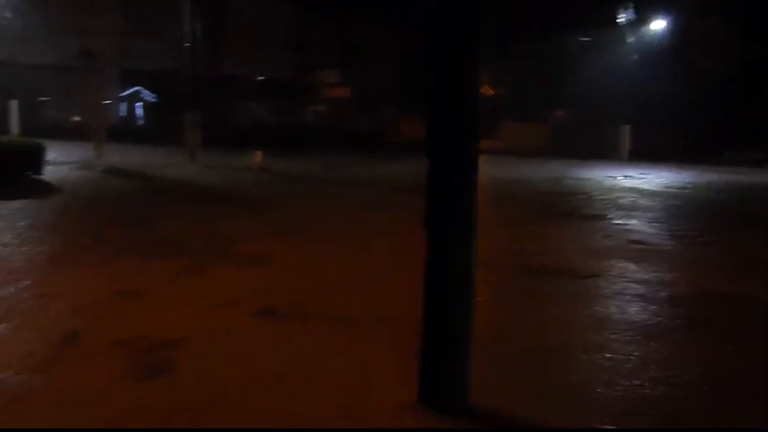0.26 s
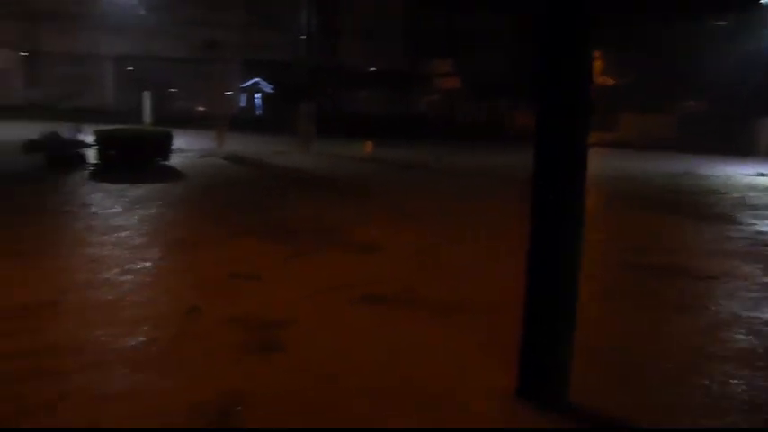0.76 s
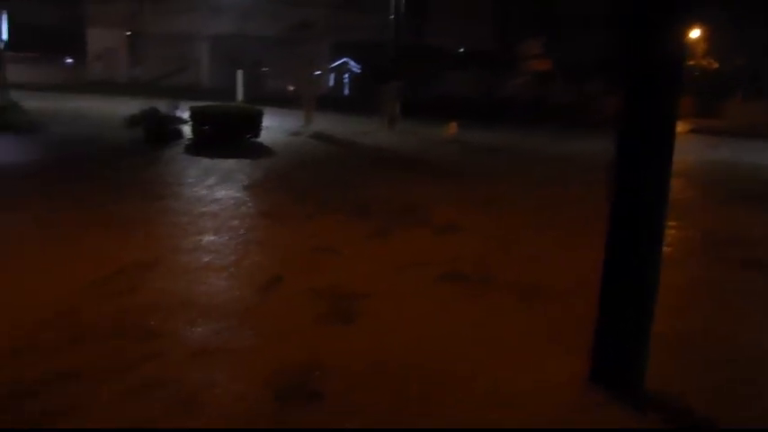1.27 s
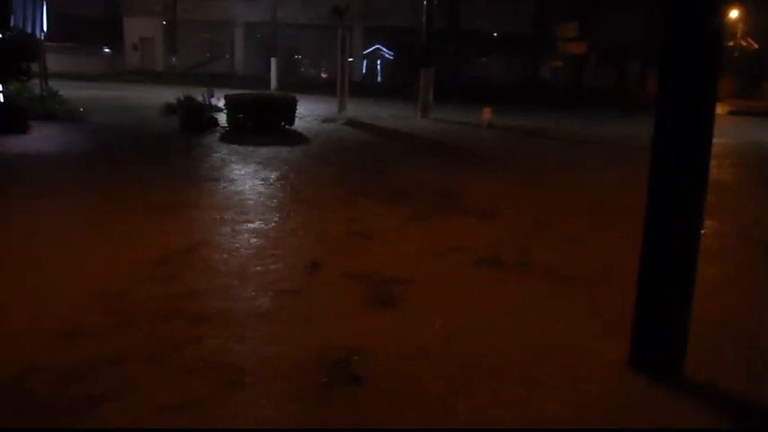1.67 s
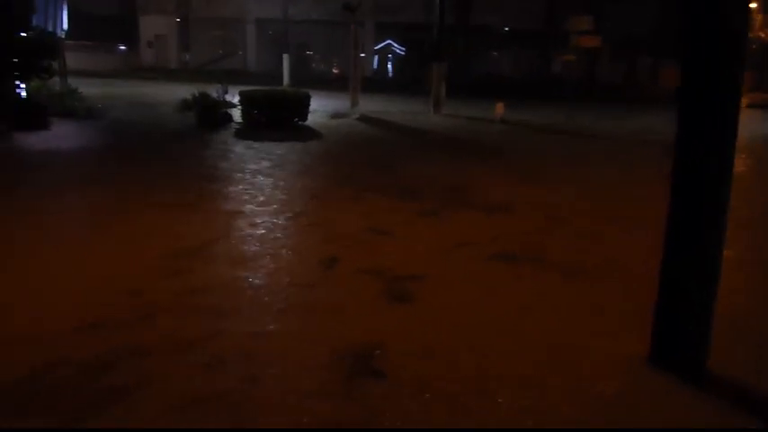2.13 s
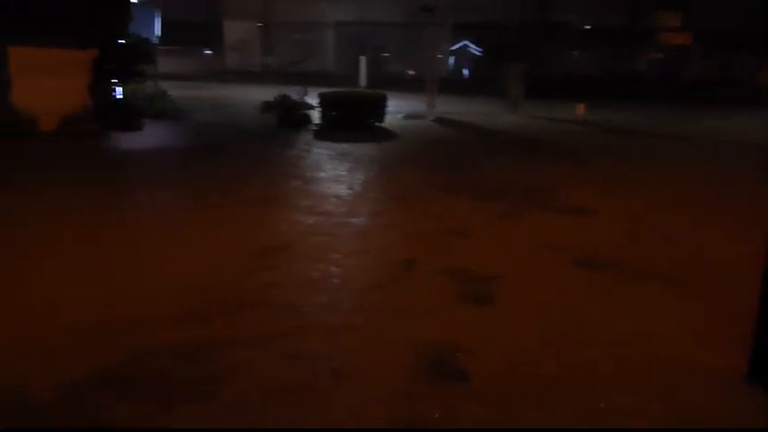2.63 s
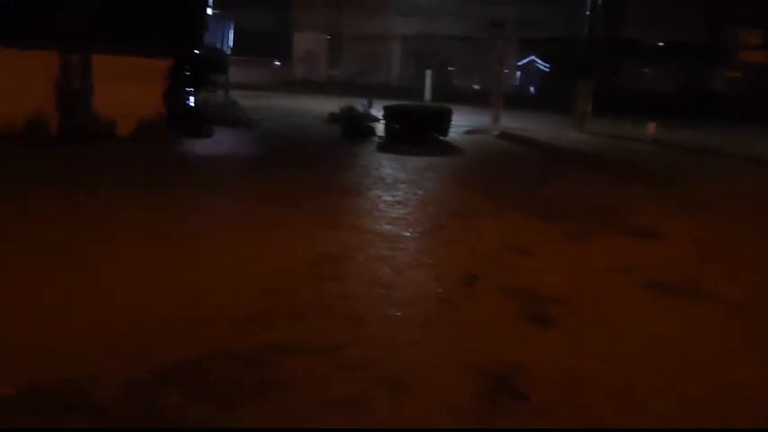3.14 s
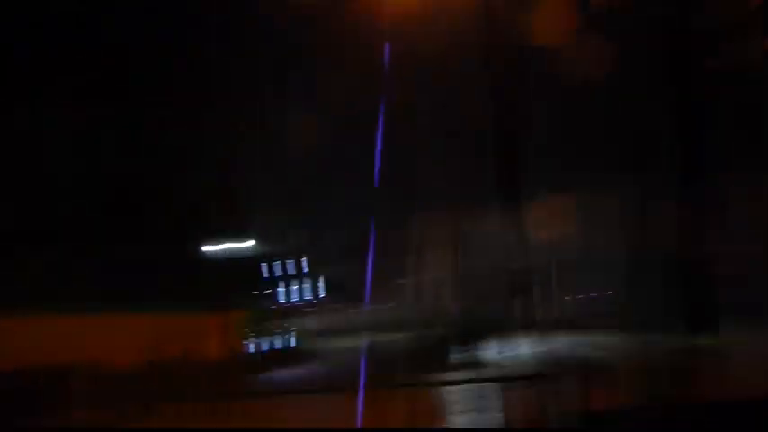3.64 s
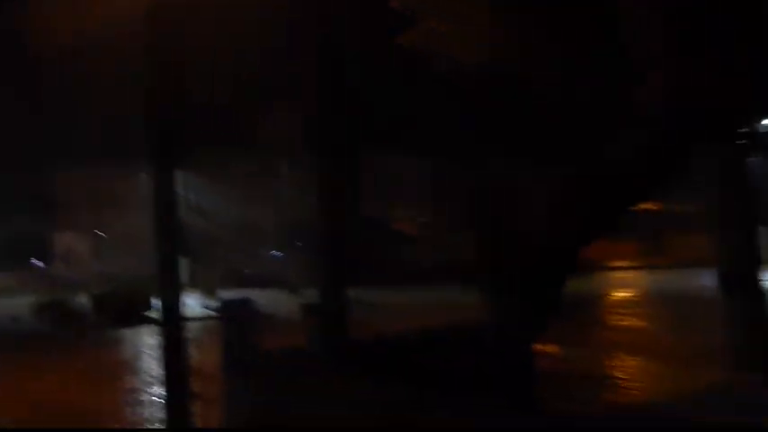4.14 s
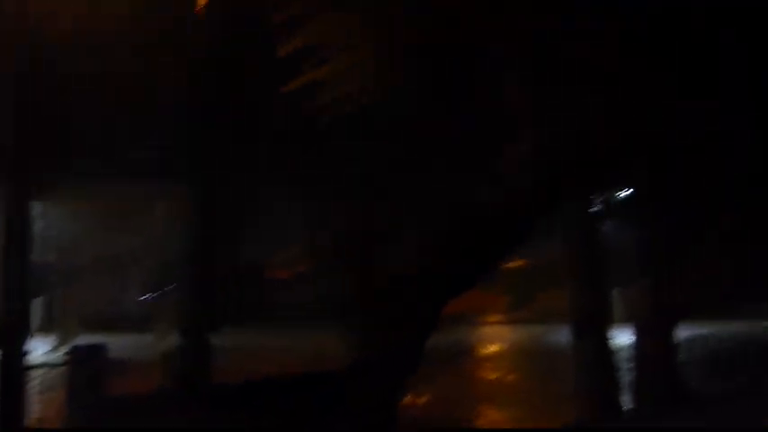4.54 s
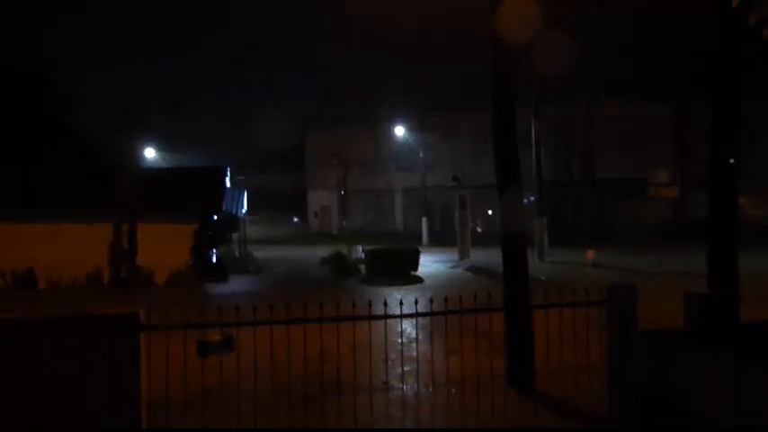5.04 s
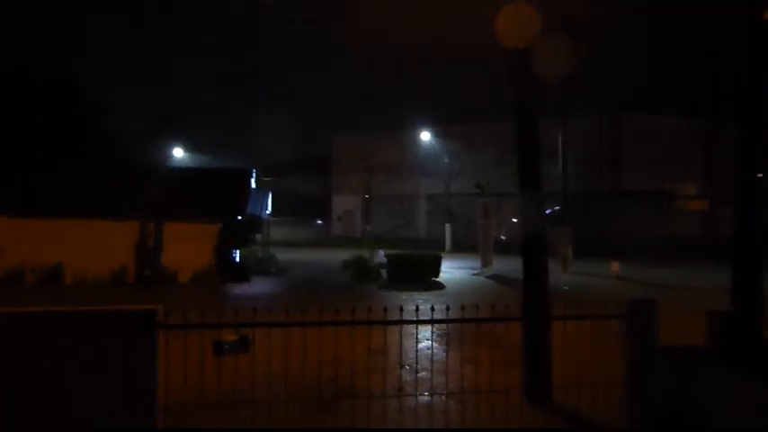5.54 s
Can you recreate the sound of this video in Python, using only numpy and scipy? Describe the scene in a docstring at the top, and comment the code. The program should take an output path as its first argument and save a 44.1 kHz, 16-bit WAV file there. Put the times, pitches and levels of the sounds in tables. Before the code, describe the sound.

Roof runoff slaps onto wet ground over a heavy downpour; the sound cuts out twice, returning as rain alone.

```python
"""Torrential night rain on a flooded street, heard from under a roof.
Runoff from the eaves slaps onto wet ground close by, in quick splats over the hiss of the downpour.
The sound cuts out twice. From the first gap on the runoff is gone, leaving the street: an even wash,
low drumming and fine spray. A few close ticks, puddle plinks and dull roof thuds dot the rain."""
import sys
import numpy as np
from scipy import signal
from scipy.fft import rfft, irfft, next_fast_len
from scipy.io import wavfile
from scipy.ndimage import uniform_filter1d, map_coordinates

SR = 44100
rng = np.random.default_rng(int(sys.argv[2]) if len(sys.argv) > 2 else 0)


def digitize_waveform(pressure):
    """Quantize a signal to 16-bit integers and store it at the path in sys.argv[1].

    Rows of a 2-D input are taken as channels; values are limited to [-1, 1].
    """
    field = np.atleast_2d(pressure).T
    bounded = np.clip(field, -1, 1)
    quanta = np.round(bounded * 32767).astype(np.int16)
    wavfile.write(sys.argv[1], SR, quanta)


N = 255780
TIME = np.arange(N) / SR

# the heaviest blobs of water landing: t/s, level/dB, nominal pitch/Hz, brightness/dB
BLOB_HITS = [(.010, -17, 1060, 4), (.026, -17.5, 930, 3), (.029, -16, 730, -3), (.035, -17.5, 790, 0),
             (.064, -13.5, 770, -2), (.067, -13.5, 800, 1), (.110, -10, 800, -6), (.202, -15, 900, -2),
             (.256, -17, 850, -1), (.343, -16.5, 830, 1), (.398, -15.5, 730, -1), (.439, -18.5, 1050, 1),
             (.446, -17, 1170, 1), (.511, -15.5, 880, 6), (.514, -18, 880, -1), (.540, -17, 700, 2),
             (.558, -19.5, 1030, 2), (.581, -16.5, 950, 1), (.584, -18, 780, 4), (.614, -15.5, 1010, -4),
             (.627, -18, 760, 2), (.636, -17, 1160, 1), (.642, -18.5, 890, 4), (.650, -18, 1020, 2),
             (.658, -18.5, 1120, 2), (.698, -15.5, 720, -1), (.752, -17.5, 900, 5), (.756, -18, 960, 3),
             (.779, -17, 1050, 1), (.835, -19, 1110, 0), (.850, -19, 940, -5), (.879, -19, 840, 0),
             (.920, -15.5, 890, -1), (.930, -18, 1040, 1), (.946, -12.3, 1080, -3), (1.008, -17, 740, 2),
             (1.039, -18, 880, 5), (1.068, -16, 1050, 1), (1.075, -17, 740, 2), (1.086, -15.5, 1080, 2),
             (1.107, -18, 900, 0), (1.134, -19, 1030, 3), (1.156, -17, 1000, 4), (1.180, -15, 780, -3),
             (1.202, -18, 820, 3), (1.232, -19, 760, 3), (1.269, -15.5, 780, -2), (1.288, -17, 1030, 0),
             (1.363, -16, 900, 3), (1.369, -17, 930, 6), (1.401, -16, 830, -1), (1.441, -17, 1000, 2),
             (1.464, -15.5, 1000, -1), (1.530, -15, 930, 0), (1.539, -18, 960, -6), (1.570, -18, 1040, -4),
             (1.578, -14.5, 850, 1), (1.625, -13, 1150, 0), (1.639, -18, 1110, 5), (1.643, -15.5, 800, -1),
             (1.671, -16, 800, -1), (1.677, -17.5, 1040, 1), (1.680, -15.5, 830, 0), (1.693, -18, 1090, 2),
             (1.699, -15, 740, 1), (1.709, -16, 1000, 3), (1.717, -15, 820, 1), (1.751, -19, 1000, -3),
             (1.773, -15, 840, 1), (1.779, -18, 840, 1), (1.799, -17, 1090, -2), (1.834, -18, 1160, -1),
             (1.865, -15, 980, -1), (1.900, -17.5, 950, -1), (1.934, -18, 1080, 0), (1.958, -17, 1130, 0),
             (1.983, -12, 830, -5), (2.088, -16.5, 1130, -1), (2.122, -18, 890, 0), (2.152, -17, 1060, -2),
             (2.196, -17, 780, -1), (2.203, -14.5, 830, -3), (2.226, -18, 830, 2), (2.254, -16.5, 1110, -1),
             (2.259, -17, 940, -2), (2.286, -18, 1090, 0), (2.312, -18, 1100, 2), (2.339, -17.5, 1140, 0),
             (2.347, -16.5, 980, 2), (2.392, -17, 920, 1), (2.395, -17.5, 1200, 0), (2.414, -15.5, 780, 2),
             (2.426, -15.5, 850, 3), (2.456, -13.5, 840, -8), (2.502, -18, 1000, 1), (2.526, -17, 1000, 0),
             (2.560, -15.5, 960, 0), (2.572, -18, 1090, 6), (2.622, -17, 950, -3), (2.681, -14.5, 1020, 0),
             (2.761, -16.5, 840, 0), (2.796, -15.5, 1070, -2), (2.827, -16.5, 1000, 5),
             (2.834, -17, 840, -6), (2.847, -16.5, 880, -3), (2.856, -14.5, 910, -2), (2.862, -14, 900, 1),
             (2.938, -17.5, 1200, 0), (2.986, -17, 1000, 2), (3.027, -15, 850, 5), (3.068, -18, 950, -2),
             (3.073, -15, 760, -2), (3.109, -16, 940, -1), (3.177, -17, 1030, -4), (3.234, -17, 870, -4)]
# tone of water slapping wet ground: f/Hz, level/dB
SLAP_EQ = [(30, -41), (100, -29), (280, -4.5), (480, -2.5), (650, 2), (1000, 0), (1480, -6), (1800, -11.5),
           (2600, -11.5), (5000, -14), (9500, -17.5), (12500, -22.5), (16000, -73)]
# stereo image of the slaps: f/Hz, left-right likeness (-1 to 1)
SLAP_IMAGE = [(40, 0.56), (200, 0.95), (1100, 0.93), (2200, 0.76), (5500, 0.77), (7000, 0.99), (11000, 1),
              (13000, 0.5)]


def amp(db):
    """Decibels to gain."""
    return 10 ** (np.asarray(db) / 20)


def unit(x):
    """Scale to rms 1."""
    return x / np.sqrt(np.mean(x ** 2) + 1e-20)


def along(points, hz):
    """Read (f/Hz, value) points on a log axis."""
    f, values = np.transpose(points)
    return np.interp(np.log(hz + 1), np.log(f + 1), values)


def curves(rows):
    """One envelope for each column after the time."""
    s, *columns = np.transpose(rows)
    return [np.interp(TIME, s, column) for column in columns]


def wobble(rate):
    """A smooth random curve with rate knots a second."""
    return map_coordinates(rng.standard_normal(int(N * rate / SR) + 4), [TIME * rate])


def filtered(x, response):
    """Multiply the spectrum of x by a response of frequency."""
    size = next_fast_len(N + SR // 4)
    return irfft(rfft(x, size) * response(np.fft.rfftfreq(size, 1 / SR)), size)[..., :N]


def add(track, s, sound):
    """Mix a short sound in at time s."""
    part = track[..., max(round(s * SR), 0):][..., :sound.shape[-1]]
    part += sound[..., :part.shape[-1]]


def scatter(shape):
    """Normal draws held within -2 to 2."""
    return np.clip(rng.standard_normal(shape), -2, 2)


def stereo(pair, image):
    """Turn two unrelated signals into left and right of the given likeness; rms 1."""
    def mid_side(hz):
        angle = np.arccos(np.clip(along(image, hz), -1, 1)) / 2
        return np.array([np.cos(angle), np.sin(angle)])
    mid, side = filtered(pair, mid_side)
    return unit(np.array([mid + side, mid - side]))


def impact(eq, shift, trail_s, size=1024):
    """One hit of water, transposed by the ratio shift; its crackle trails by trail_s at 10 kHz."""
    hz = np.fft.rfftfreq(size, 1 / SR)
    cepstrum = irfft(np.log(amp(along(eq, hz / shift))))
    minimum_phase = rfft(2 * cepstrum[:size // 2] * (np.arange(size // 2) > 0), size)
    lag = np.pi * trail_s * hz ** 2 / 10 ** 4
    pulse = irfft(np.exp(minimum_phase - 1j * lag))
    return pulse / np.abs(pulse).max()


def drops(rate, spread_db):
    """Drops of uneven size strike at random, about rate a second."""
    return (rng.random(N) < rate / SR) * amp(spread_db * scatter(N))


def patter(eq, image, rate, near_db, patchy_db):
    """Countless far drops merge into drifting patches of noise, with nearer single drops on top."""
    noise = signal.stft(rng.standard_normal((2, N)), nperseg=512)[2]
    patches = uniform_filter1d(rng.standard_normal(noise.shape[1:]), size=6, axis=0)
    patches = uniform_filter1d(patches, size=14, axis=1)
    far = signal.istft(noise * amp(patchy_db * unit(patches)), nperseg=512)[1][:, :N]
    near = unit(drops(rate, spread_db=3.5) * rng.standard_normal((2, N)))
    rain = filtered(far + amp(near_db) * near, lambda hz: amp(along(eq, hz)))
    return stereo(rain, image)


def surging(trickle_db, count=150):
    """Weak surges at uneven gaps ride on a wavering trickle, which now and then falters; rms 1."""
    gap_s, width_s, surge_db = .038, .0087, -4.5
    lull_width_s, lull_depth = .011, .75
    surges, t = np.zeros(N), np.arange(SR // 16) / SR
    swell = np.exp(-.5 * ((t - t.mean()) / width_s) ** 2)
    for s in np.cumsum(gap_s * np.exp(.45 * scatter(count))):
        add(surges, s, amp(surge_db) ** 2 * swell)
    lulls = sum(np.exp(-.5 * ((TIME - s) / lull_width_s) ** 2) for s in (.305, .478, 1.74, 2.012, 2.276))
    trickle = amp(trickle_db + wobble(40))
    return unit((1 - lull_depth * lulls) * np.sqrt(surges + trickle ** 2))


def runoff(level_db, trickle_db, rate, spread_db, froth_db):
    """A broken stream from the eaves: each surge lands as a cluster of slaps of slightly varied pitch."""
    # how hard the water runs: t/s, level/dB
    flow_levels = [(0.0, -23), (0.2, -28.5), (1.1, -27.5), (1.45, -26.5), (1.67, -24), (2.05, -23),
                   (2.35, -22), (2.85, -22.5), (3.26, -24)]
    flow = amp(curves(flow_levels)[0] + level_db) * surging(trickle_db)
    slaps = np.zeros((2, N))
    for shift in (.92, 1, 1.06):
        hits = drops(rate * unit(flow), spread_db)  # more water, more drops
        pan = 2 * rng.random(N) - 1
        # droplets thrown up fall back
        froth = amp(froth_db) * np.sqrt(unit(flow)) * rng.standard_normal((2, N))
        mid = unit(hits - uniform_filter1d(hits, size=1024))
        force = np.array([mid, unit(hits * pan)]) + froth
        slap = impact(SLAP_EQ, shift, trail_s=.0005)
        slaps += signal.fftconvolve(force, slap[None], axes=1)[:, :N]
    stream = unit(stereo(slaps, SLAP_IMAGE) * np.sqrt(flow))
    return stream * np.sqrt(np.mean(flow ** 2))


def blobs(level_db, usual_hz, edge_db, top_db):
    """A heavy blob flattens in one hard push and pull of air; a faster one has a brighter edge."""
    out = np.zeros(N)
    trails_s = rng.uniform(.0004, .0008, len(BLOB_HITS))
    for (s, db, hz, bright_db), trail_s in zip(BLOB_HITS, trails_s):
        body = [(f * hz / usual_hz, level + (bright_db + edge_db) * (f > 1700))
                for f, level in SLAP_EQ if f < 7000]
        top = [(f, level + top_db) for f, level in SLAP_EQ if f >= 7000]
        pulse = impact(body + top, shift=.98, trail_s=trail_s)
        attack_rms = np.sqrt(np.mean(pulse[:128] ** 2))
        add(out, s, amp(db + level_db) * pulse / attack_rms)
    return out


def surface(blows):
    """The struck surface answers every blow with a short hollow ring."""
    # resonances: f/Hz, bandwidth/Hz, level/dB
    modes = [(648, 57, -19), (960, 42, -10.5), (1220, 52, -3.5), (1445, 49, 0.5), (1820, 80, -5),
             (2280, 170, -18), (2600, 130, -11)]

    def ring(f):
        return sum(amp(db) * 1j * f * width / (hz ** 2 - f ** 2 + 1j * f * width)
                   for hz, width, db in modes)
    return filtered(blows, lambda f: 1 + ring(f))


def splashes(level_db, decay_s):
    """Each blob bursts into droplets that fall back in a short wet spatter."""
    # tone of the spatter: f/Hz, level/dB
    splash_eq = [(500, -9), (1500, -5), (2600, 0.5), (5000, 7), (9000, -1.5), (15000, -23.5)]
    bursts, t = np.zeros((2, N)), np.arange(SR // 20) / SR
    for s, db, _, bright_db in BLOB_HITS:
        add(bursts, s, amp(db + bright_db + level_db) * np.exp(-t / decay_s))
    return bursts * patter(splash_eq, SLAP_IMAGE, rate=990, near_db=-6.5, patchy_db=5.5)


def downpour(levels, wash_db, bubble_db, drum_db, spray_db):
    """The rain bed: a steady, bubbling wash on the flood water, drumming on roofs and fizzing spray."""
    # tone of each layer: f/Hz, level/dB
    wash_eq = [(40, -42.5), (85, -27.5), (150, -11), (270, -2), (450, -0.5), (650, 2), (850, 0),
               (1400, -.5), (1800, -2.5), (2500, -3), (4000, -3), (7000, -6.5), (10000, -25), (13000, -24),
               (16000, -47)]
    drum_eq = [(20, -31), (50, -21), (85, -8.5), (125, -1.5), (200, -1), (280, 1.5), (450, -3.5),
               (800, -17), (2000, -56)]
    spray_eq = [(100, -55), (600, -23.5), (3000, -15), (6000, -7), (8000, 3), (10500, 3), (12500, -1),
                (14500, -12), (16000, -50.5)]
    # stereo image of each layer: f/Hz, left-right likeness (-1 to 1)
    wash_image = [(40, 0.77), (200, 0.96), (500, 0.93), (1000, 0.82), (1800, 0.4), (4000, 0.23),
                  (6000, 0.25), (11500, -0.517)]
    drum_image = [(40, 0.53), (110, 0.97), (300, 0.98)]
    spray_image = [(11000, .5), (13000, .3)]
    drum_ride, spray_ride = curves(levels)
    wash = patter(wash_eq, wash_image, rate=2500, near_db=-11, patchy_db=1.1)
    wash += amp(bubble_db) * bubbles(count=700, usual_hz=1405.5, pitch_spread=.6, cycles=70, spread_db=4)
    drum = patter(drum_eq, drum_image, rate=400, near_db=-7.5, patchy_db=.84)
    spray = patter(spray_eq, spray_image, rate=1500, near_db=-10, patchy_db=1.1)
    return amp(wash_db) * wash + amp(drum_ride + drum_db) * drum + amp(spray_ride + spray_db) * spray


def bubbles(count, usual_hz, pitch_spread, cycles, spread_db):
    """Bubbles trapped by the drops ring, rising slightly and dying by 60 dB over cycles; rms 1."""
    out, t = np.zeros((2, N)), np.arange(SR // 12) / SR
    for s, (pitch, size, pan) in zip(rng.random(count) * N / SR, scatter((count, 3))):
        turns = usual_hz * np.exp(pitch_spread * pitch) * t
        age = np.minimum(turns / cycles, 2)
        envelope = amp(-60 * age) * (1 - np.exp(-turns))
        ring = np.sin(2 * np.pi * turns * (1 + .013 * age)) * envelope
        add(out, s, amp(spread_db * size + 2 * np.array([[pan], [-pan]])) * ring)
    return unit(out)


def ticks(t60_s, attack_s):
    """Small drops strike close by with a sharp, gritty tick."""
    # strikes: t/s, level/dB, f/Hz, left minus right/dB
    strikes = [(0.1478, -14, 10000, 6), (4.8126, -9, 10600, -2)]
    out, t = np.zeros((2, N)), np.arange(SR // 10) / SR
    envelope = amp(-60 * t / t60_s) * (1 - np.exp(-t / attack_s))
    for s, db, hz, pan_db in strikes:
        phase = 2 * np.pi * hz * t + .5 * np.cumsum(rng.standard_normal(len(t)))
        add(out, s, amp([[db + pan_db / 2], [db - pan_db / 2]]) * np.sin(phase) * envelope)
    return out


def thuds(swell_s):
    """Water lands on the roof in soft, dull thuds that swell and die within a few cycles."""
    # landings: t/s, level/dB, f/Hz
    landings = [(0.336, -22.5, 159), (0.823, -26, 125), (1.328, -36, 143), (5.02, -27.5, 135),
                (5.269, -28, 265)]
    out, t = np.zeros(N), np.arange(SR // 5) / SR
    envelope = t / swell_s * np.exp(1 - t / swell_s)
    for s, db, hz in landings:
        add(out, s, amp(db) * envelope * np.sin(2 * np.pi * hz * t))
    return out


def plinks(t60_s, glide):
    """Single bubbles ring in a puddle, their pitch rising as they surface."""
    # puddle bubbles: t/s, level/dB, starting f/Hz
    rings = [(3.886, -27, 2020), (4.335, -27, 2450)]
    out, t = np.zeros(N), np.arange(SR // 10) / SR
    for s, db, hz in rings:
        add(out, s, amp(db - 60 * t / t60_s) * np.sin(2 * np.pi * hz * t * (1 + glide * t)))
    return out


def scene():
    """Three stretches of rain, hard cut with silence between; the mix leans a little to the right."""
    # audible stretches: start/s, end/s
    stretches = [(-1, 3.265), (3.814, 4.819), (4.921, 7)]
    # fader rides of the rain bed in each stretch: t/s, drumming level/dB, spray level/dB
    opening_rides = [(0.0, -37.5, -34), (0.2, -41, -35.5), (0.35, -36, -33.5), (0.55, -36.5, -33.5),
                     (0.75, -36, -38), (1.1, -34.5, -31), (1.55, -38, -35.5), (1.9, -37, -32),
                     (2.1, -38, -34), (3.26, -38.5, -34.5)]
    middle_rides = [(3.82, -46.5, -39.5), (4.0, -45.5, -38), (4.2, -47, -38.3), (4.33, -63, -38.3),
                    (4.45, -52, -36.3), (4.62, -60, -37.7), (4.81, -51, -37)]
    closing_rides = [(4.93, -34, -36), (5.1, -38, -36), (5.27, -33.5, -38.5), (5.42, -39.5, -35.5),
                     (5.6, -42, -32.5), (5.8, -43, -35.5)]
    # stereo balance: f/Hz, left minus right/dB
    balance = [(40, 0), (250, -1), (1000, -1.4), (4000, -1.4), (12000, -0.5)]
    slaps = runoff(level_db=-1.5, trickle_db=-1, rate=300, spread_db=3, froth_db=-14)
    slaps += blobs(level_db=-2.2, usual_hz=900, edge_db=-1.5, top_db=-3.5)
    eaves = surface(slaps) + splashes(level_db=-15.5, decay_s=.0045)
    opening = eaves + downpour(opening_rides, wash_db=-28.5, bubble_db=-5.5, drum_db=4.5, spray_db=-.5)
    middle = downpour(middle_rides, wash_db=-25, bubble_db=-20, drum_db=1, spray_db=8)
    closing = downpour(closing_rides, wash_db=-25.5, bubble_db=-18, drum_db=5.5, spray_db=4)
    close_ups = ticks(t60_s=.009, attack_s=.0001) + thuds(swell_s=.0078) + plinks(t60_s=.07, glide=1.2)
    mix = np.zeros((2, N))
    for rain, (start, end) in zip((opening, middle, closing), stretches):
        mix += (rain + close_ups) * ((TIME > start) & (TIME < end))
    return filtered(mix, lambda hz: amp(np.outer([.5, -.5], along(balance, hz))))


def record(dry):
    """A steep high cut takes off the very top of the hiss."""
    cutoff_hz, transition_hz = 15700, 600
    return filtered(dry, lambda hz: np.clip((cutoff_hz - hz) / transition_hz + .5, 0, 1))


dry = scene()
out = record(dry)
digitize_waveform(out)
```